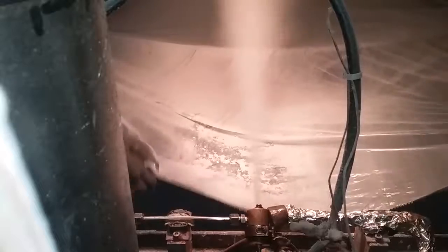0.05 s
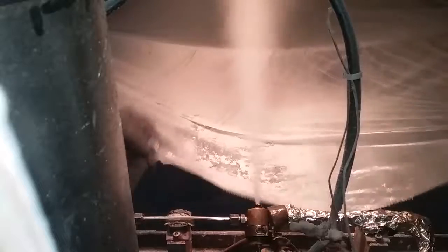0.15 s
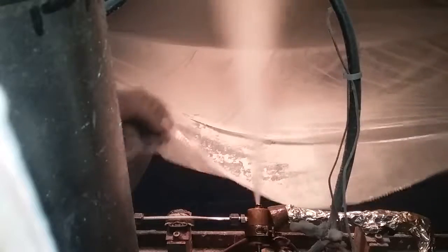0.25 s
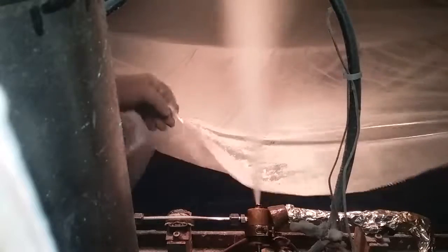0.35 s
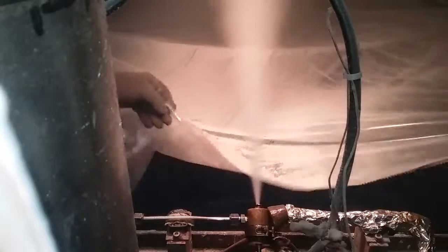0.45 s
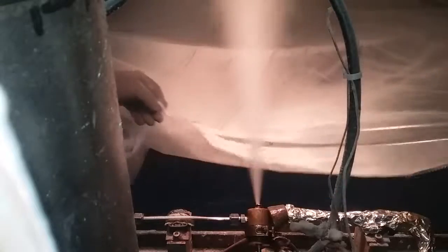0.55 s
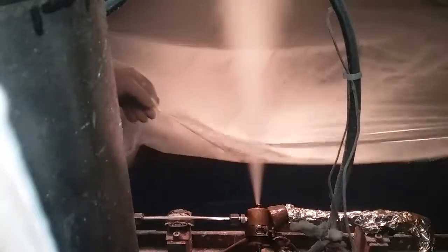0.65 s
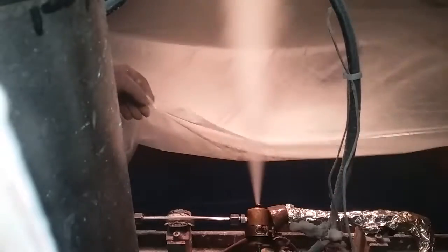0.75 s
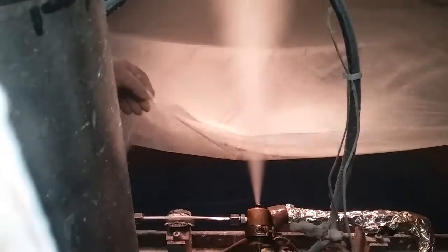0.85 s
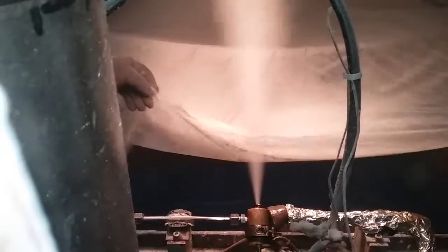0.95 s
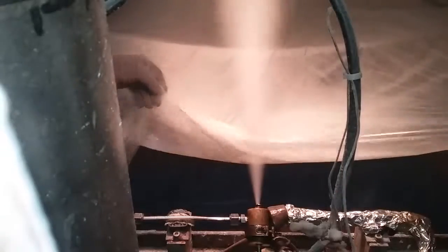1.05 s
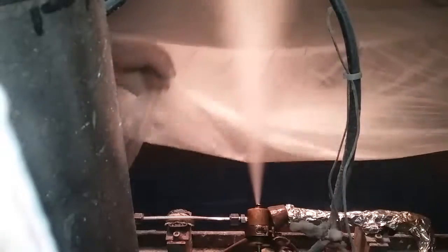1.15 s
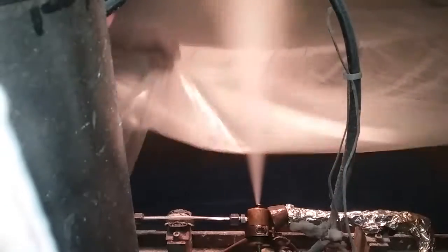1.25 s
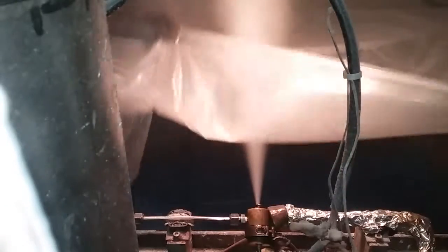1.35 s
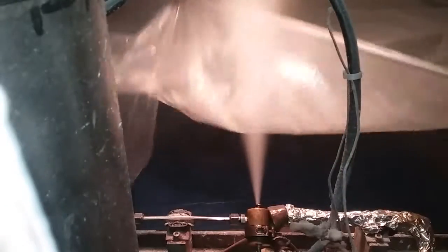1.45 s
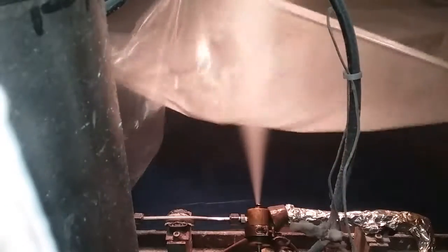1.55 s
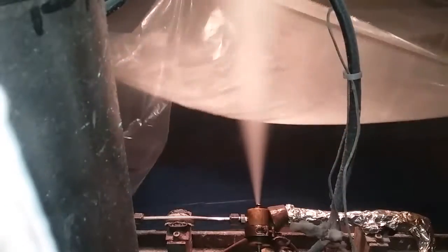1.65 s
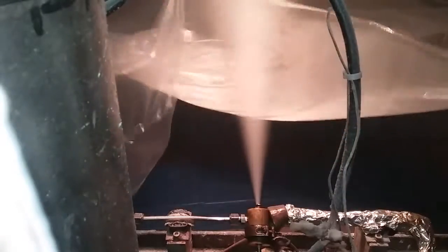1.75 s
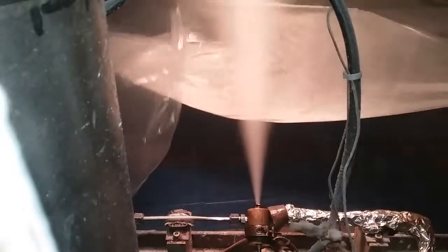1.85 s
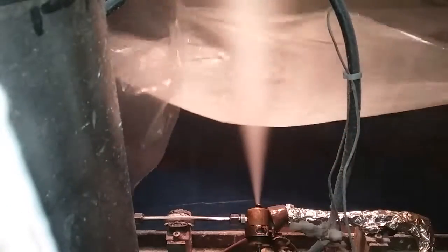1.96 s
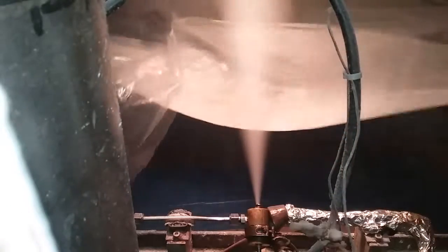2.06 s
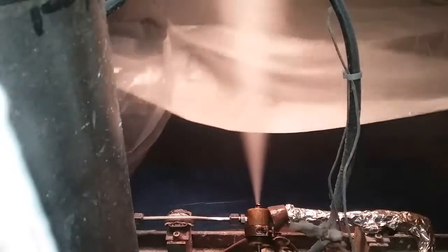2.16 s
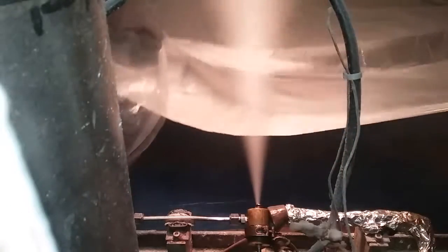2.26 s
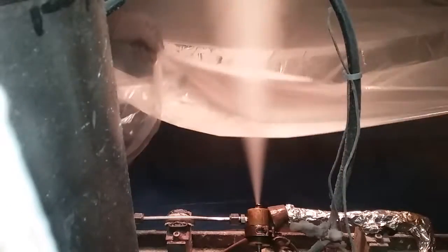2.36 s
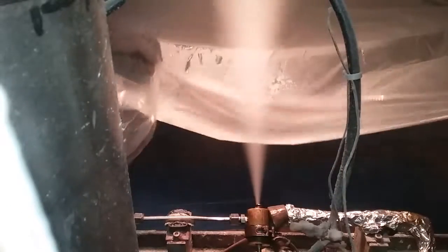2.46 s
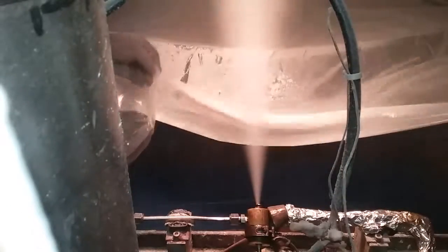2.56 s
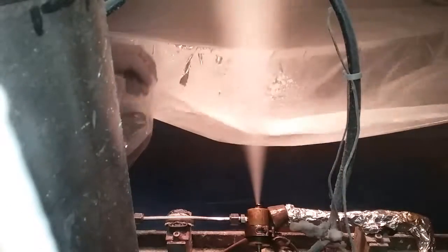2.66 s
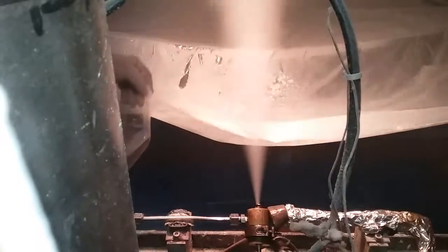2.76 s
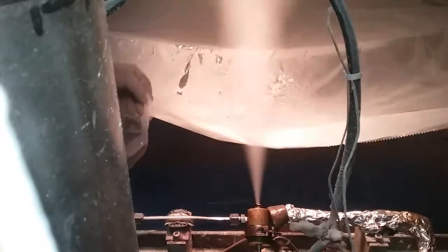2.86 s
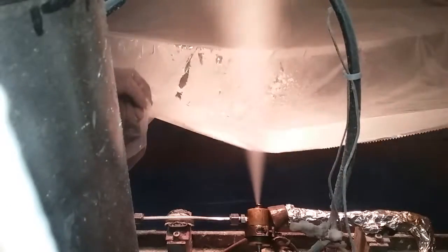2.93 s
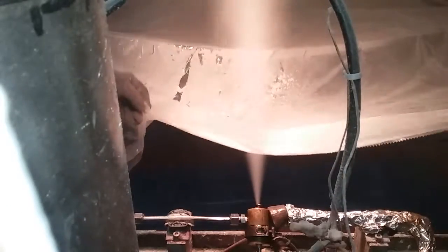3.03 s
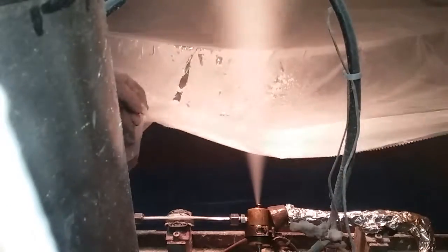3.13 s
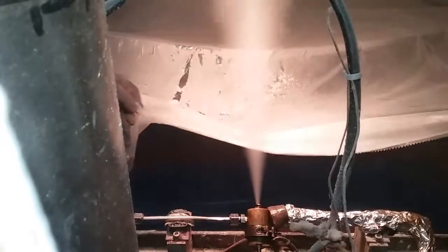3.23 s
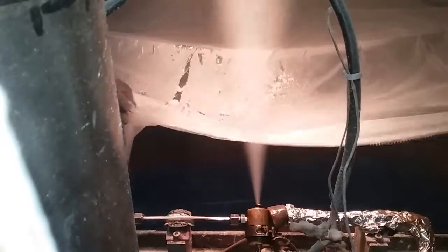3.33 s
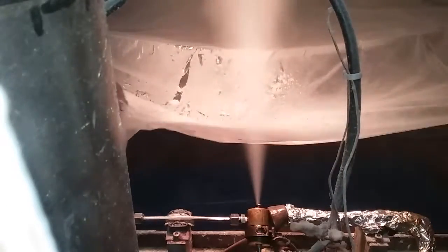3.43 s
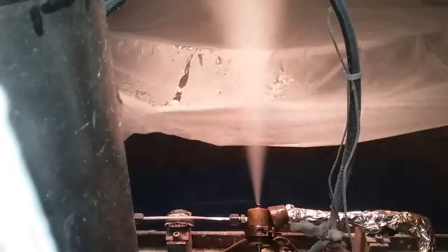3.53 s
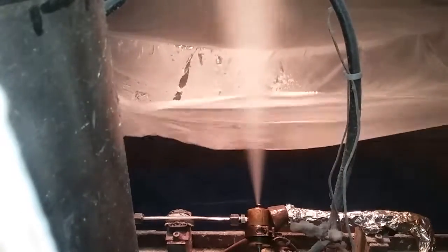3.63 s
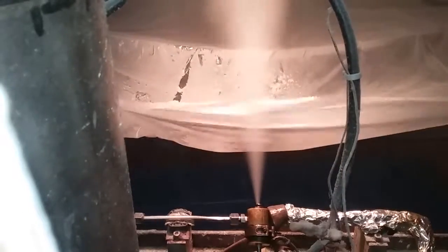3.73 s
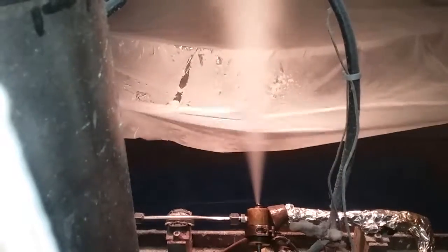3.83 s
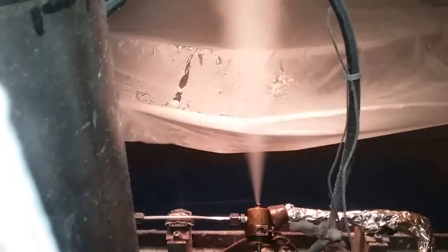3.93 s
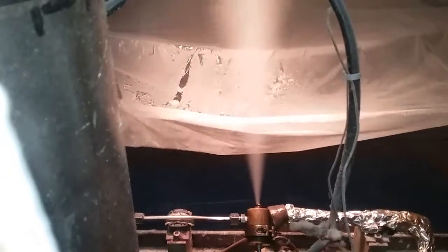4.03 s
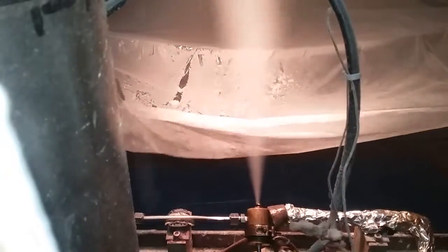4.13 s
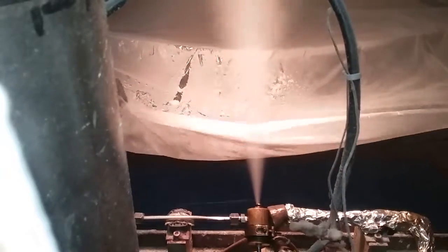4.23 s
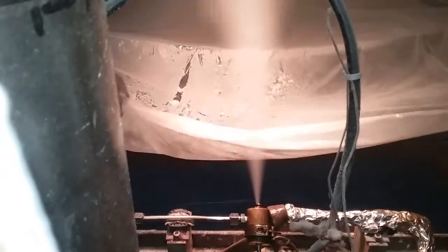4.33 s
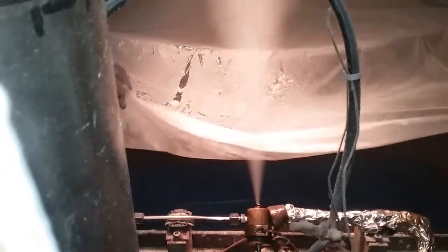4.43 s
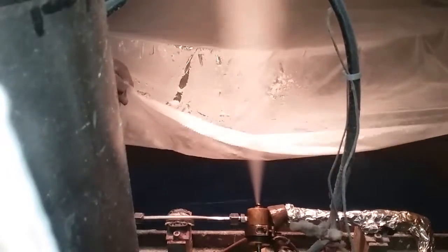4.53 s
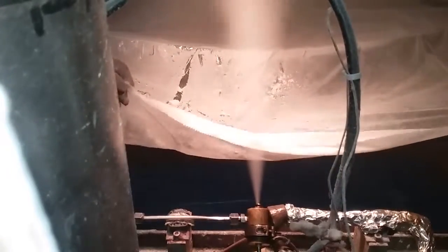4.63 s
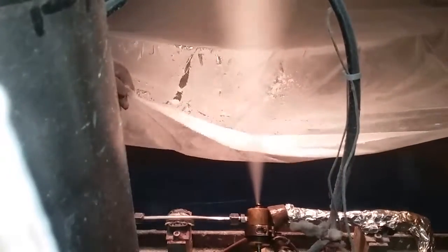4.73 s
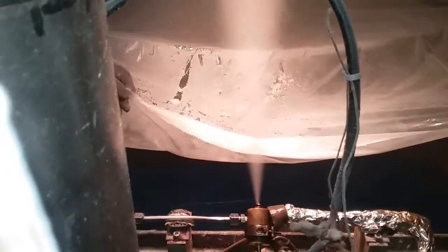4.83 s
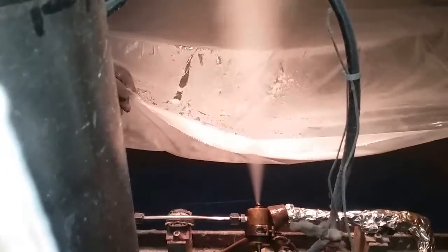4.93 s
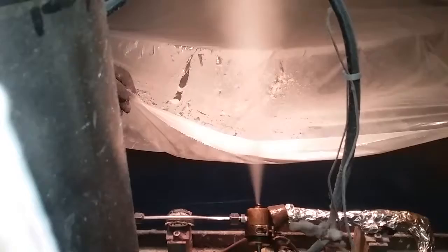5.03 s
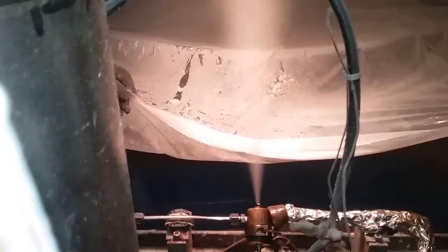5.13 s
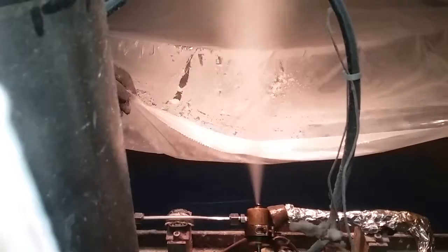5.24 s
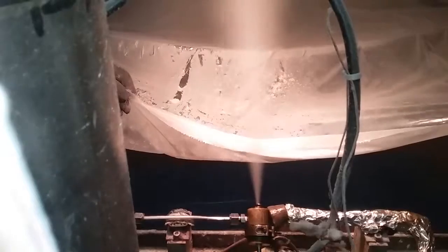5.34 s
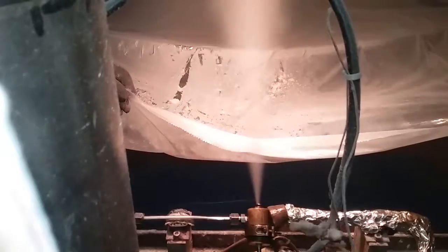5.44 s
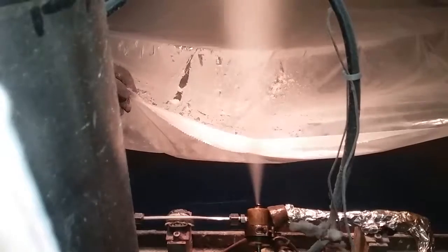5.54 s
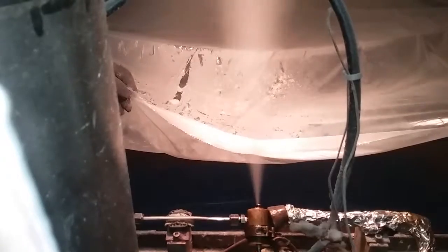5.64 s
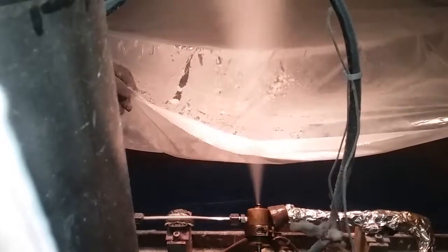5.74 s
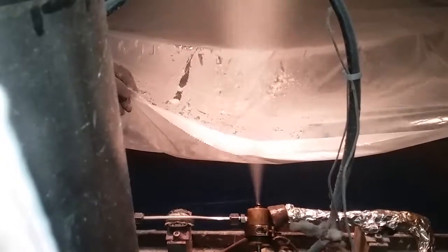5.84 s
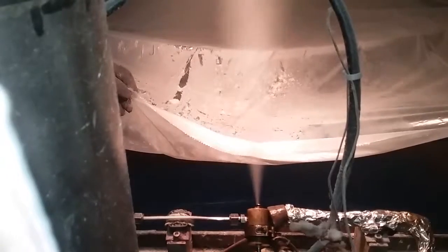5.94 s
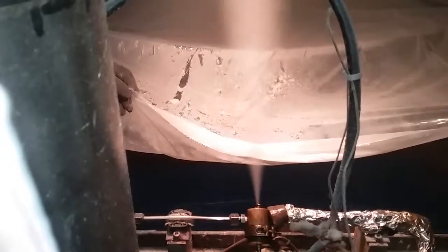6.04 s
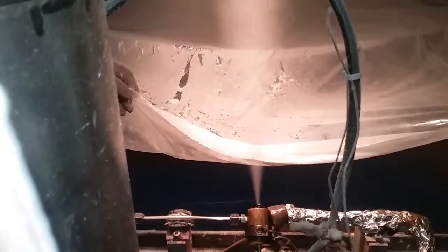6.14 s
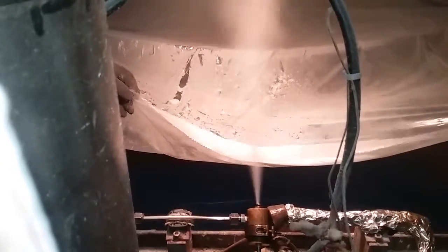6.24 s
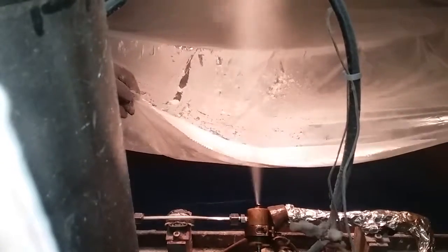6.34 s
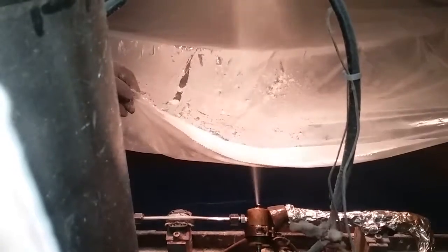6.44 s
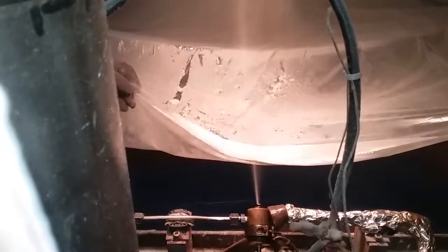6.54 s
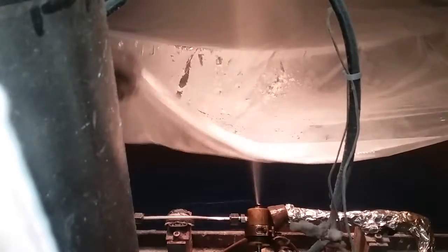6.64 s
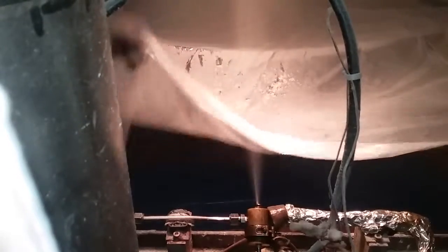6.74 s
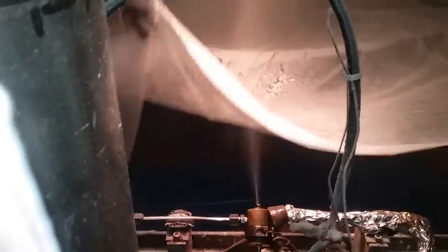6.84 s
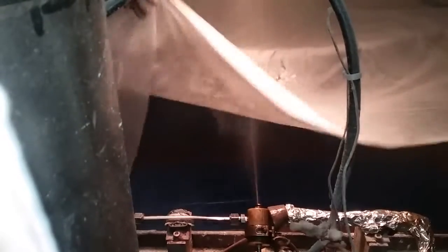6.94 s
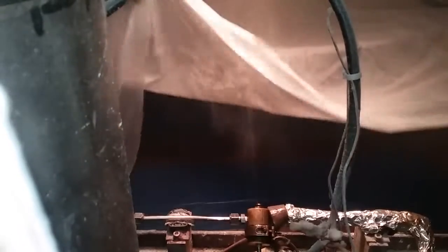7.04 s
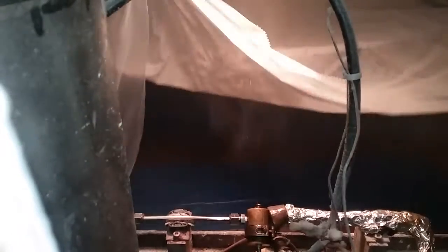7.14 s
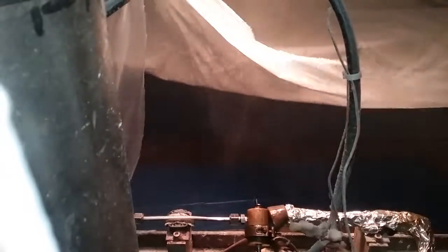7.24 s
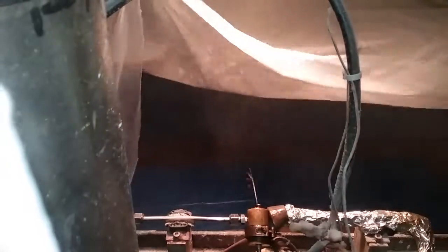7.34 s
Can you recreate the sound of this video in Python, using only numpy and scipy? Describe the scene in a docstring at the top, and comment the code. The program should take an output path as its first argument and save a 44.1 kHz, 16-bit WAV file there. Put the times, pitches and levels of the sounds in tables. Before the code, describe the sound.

A loud broadband hiss, full in the mids and airy on top, blasts steadily from a nearby nozzle under a plastic sheet, with two faint brighter sizzles as mist grazes the plastic. It fades quickly to a fluttering trickle, spits, pings and dies after seven seconds, leaving quiet indoor machine hum, thin high tones and small chirring pulses. Close wide stereo, short room echo.

```python
"""A workshop, with a stereo phone microphone close to a nozzle that jets fine mist up into a plastic sheet.
The hiss is noise in three bands, coloured by standing waves between sheet and rig; echoes off the moving
sheet slide in time, so the treble shimmers. The pressure sags, then the jet sputters, pings and fizzes out.
A quiet room is left: noise with a low machine hum, narrow whines, steady tones and a high, pulsing chirr."""
import sys
import numpy as np
from scipy import signal
from scipy.fft import rfft, irfft, next_fast_len
from scipy.io import wavfile
from scipy.ndimage import map_coordinates

SR = 44100
rng = np.random.default_rng(int(sys.argv[2]) if len(sys.argv) > 2 else 0)


def to_wav(s):
    """Save 16-bit WAV."""
    ch = np.atleast_2d(s).T  # columns
    pcm = np.round(np.clip(ch, -1, 1) * 32767)  # PCM
    wavfile.write(sys.argv[1], SR, pcm.astype(np.int16))


N = 325524
TIME = np.arange(N) / SR
PADDED = next_fast_len(N + SR // 2, True)  # room for the echo tails
FREQ = np.fft.rfftfreq(PADDED, 1 / SR)
SIDES = np.array([[.5], [-.5]])  # shares a left-minus-right difference between the two ports
TOP_HZ = 15700  # the microphone's upper limit

# distance of the sheet above the nozzle: (time [s], height [m])
SHEET_HEIGHT = [(0, .005), (.25, .01), (.75, .06), (1.25, .065), (1.7, .11), (3, .07), (3.5, .08),
                (4.6, .06), (6.5, .052), (7.3, .14)]
# the valve closes, lingers at a trickle and shuts: (time [s], hiss against full pressure [dB])
VALVE_CLOSING = [(5.92, 0), (6.06, -0.6), (6.27, -4), (6.38, -14), (6.76, -13.5), (6.93, -18.5),
                 (7.04, -26.5), (7.12, -29), (7.17, -52)]
# the jet grazes the moving sheet: (time [s], length [s], sizzle against the jet level [dB])
SHEET_GRAZES = [(1.47, 0.24, -9), (3.832, .2, -6)]


def undb(db):
    """Decibels to gain."""
    return 10 ** (np.asarray(db) / 20)


def unit(x):
    """Scale to rms 1."""
    return x / np.sqrt(np.mean(x ** 2))


def curve(rows):
    """The values of a (time, value) table, joined by straight lines."""
    times, values = np.transpose(rows)
    return np.interp(TIME, times, values)


def spectrum(rows):
    """The values of a (frequency, value) table, joined on a log frequency axis."""
    hz, values = np.transpose(rows)
    return np.interp(np.log(FREQ + 1), np.log(hz), values)


def bell(x, centre, width):
    """A bump of height 1 and the given width at half height."""
    return .5 ** ((2 * (x - centre) / width) ** 2)


def swells(rows):
    """Gain over time: one bump for each row of (time [s], length [s], peak [dB])."""
    return sum(undb(db) * bell(TIME, at_s, length_s) for at_s, length_s, db in rows)


def shape(x, gain):
    """Filter by a gain for every frequency."""
    return irfft(rfft(x, PADDED) * gain, PADDED)[..., :N]


def walk(rate):
    """Slow random wandering of rms 1, its spectrum halved at the given rate [Hz]."""
    return unit(shape(rng.standard_normal(N), bell(FREQ, 0, 2 * rate)))


def noise_pair(likeness):
    """Left and right white noise that share the given part (0-1) of their power."""
    shared = shape(rng.standard_normal(N), np.sqrt(likeness))
    separate = shape(rng.standard_normal((2, N)), np.sqrt(1 - likeness))
    return shared + separate


def droplets(per_s, spread_db):
    """Tiny impacts on the sheet: many faint, a few stronger."""
    hit = rng.random(N) < per_s / SR
    strength = rng.standard_normal(N) * undb(spread_db * rng.standard_normal(N))
    return unit(hit * strength)


def echoes(x, t60_s):
    """A diffuse tail as strong as the sound itself, different at each port."""
    tail = rng.standard_normal((2, N)) * np.exp(-np.log(1000) * TIME / t60_s)
    return shape(x, rfft(unit(tail), PADDED) / np.sqrt(N))


def spray(gain_db=1.29, full_db=-19, sag_db=12, surge_db=0.07):
    """The jet as heard in the workshop, surging slightly; weak runs from 0 at full pressure to 1 at a trickle."""
    jet_db, mist_db, rush_db = flow()
    weak = np.clip((full_db - jet_db) / sag_db, 0, 1)
    plume = nozzle(mist_db, rush_db, weak)
    jet = standing_waves(thinning(plume, weak))
    surging = undb(jet_db + surge_db * walk(rate=2.5))
    return workshop(surging * (undb(gain_db) * jet + sheet_contact()))


def flow(full_db=-16.5, sag_db_per_s=0.2182, graze_shade_db=-1.05):
    """Levels in dB of jet, fine mist and low rush: all follow the pressure, and a thin jet is duller."""
    # the thin jet chokes or spurts for a moment: (time [s], length [s], level change [dB])
    sputters = [(6.295, .02, -1.5), (6.339, .02, 3.5), (6.42, .035, -3.5), (6.45, 0.026, 2),
                (6.527, .016, 0), (6.575, 0.043, -6.5), (6.812, .02, -1), (6.875, 0.028, -0.5),
                (6.938, .014, 1), (6.97, 0.03, -6.5), (7, .016, 3)]
    valve_db = curve(VALVE_CLOSING)
    sputter_db = sum(db * bell(TIME, at_s, length_s) for at_s, length_s, db in sputters)
    # a grazing sheet shields the nozzle
    shade_db = graze_shade_db * sum(bell(TIME, at_s, length_s) for at_s, length_s, _ in SHEET_GRAZES)
    jet_db = full_db - sag_db_per_s * TIME + valve_db + sputter_db + shade_db

    # mist and rush are levels against the hiss; the mist sags faster than the hiss
    mist_db = -.2 * TIME - .5 * (1 - undb(valve_db))
    # the last liquid leaves as a bright spit of mist, then the mist dries up
    spit_db = 7 * bell(TIME, 6.99, .09)
    drying_db = 170 * np.maximum(TIME - 7.035, 0)
    mist_db = mist_db + spit_db - drying_db

    # the rush gains as the valve takes pressure away, and when the sheet is close to the nozzle
    close_db = 3 * np.exp(-curve(SHEET_HEIGHT) / .033)
    rush_db = -2 - .37 * valve_db + close_db
    return jet_db, mist_db, rush_db


def nozzle(mist_db, rush_db, weak, drops_db=-11, mist_flicker_db=.5, flutter_db=1.5):
    """The turbulent plume reaches the ports partly alike; its bands surge together, more so in a weak jet."""
    # how alike the two ports hear the plume: (frequency [Hz], likeness [0-1])
    port_likeness = [(420, 1), (650, .78), (900, .78), (1100, .4), (1330, .78), (1800, .52), (2000, .76),
                     (2500, .42), (2980, .55), (3630, .4), (4150, .82), (4650, .36), (4970, .32),
                     (5150, .68), (5500, .68), (5700, .42), (6300, .36), (7000, .42), (13000, .45),
                     (15500, .28)]
    plume = noise_pair(spectrum(port_likeness))
    # large eddies make the low rush, the break-up into fine mist makes the top
    low = 1 / (1 + (FREQ / 1350) ** 6)
    high = 1 - 1 / (1 + (FREQ / 6300) ** 8)
    hiss = shape(plume, 1 - low - high)
    mist = shape(plume + undb(drops_db) * droplets(per_s=3300, spread_db=1.5), high)
    mist = mist * undb(mist_db + mist_flicker_db * walk(rate=37))
    rush = shape(plume, low) * undb(rush_db + flutter_db * weak * walk(rate=25))
    eddies_db = .2 * walk(rate=22) + (.3 + .9 * weak) * walk(rate=110)
    return (rush + hiss + mist) * undb(eddies_db)


def thinning(x, weak, offset_db=-1.5):
    """A thin jet sounds from one point, so its echoes off sheet and rig stay sharp and hollow the tone."""
    # resonances and hollows: (frequency [Hz], width [Hz], left level [dB], right level [dB])
    thin_jet = [(740, 380, 5, 5), (1020, 120, 3, 3), (1150, 110, -4, -4), (1420, 420, -2, -3),
                (1990, 220, 3, 3.5), (2360, 260, -6, -6), (2680, 130, 2, -1), (2830, 110, -4, -4),
                (2970, 90, 1.5, 1.5), (3140, 140, 3.5, 3.5), (3660, 140, -4, -4), (3910, 110, -1, -4),
                (4130, 200, 4.5, 5.5), (4440, 150, 3.5, 1), (4720, 190, -8, -6.5), (5100, 220, 2.5, 4),
                (5330, 200, 1, 4), (5600, 150, 5, 2.5), (5790, 90, 0, 4), (5920, 110, -2, -5),
                (6560, 120, -3, -4), (6810, 170, -8, -7), (7150, 220, 6, 1), (7450, 150, -7, -7),
                (7700, 150, 3, 3), (7900, 150, -6, -4), (8300, 350, 3, 4.5), (8680, 200, 4, 1),
                (8860, 130, -4, -6), (9120, 250, 7, 3.5), (9950, 250, -1, 3.5), (10450, 600, 3.5, -1),
                (11200, 400, -1, -2), (11650, 300, -3.5, -4.5), (12900, 300, 1, -4.5),
                (13650, 350, 0, -2.5), (14800, 250, 0, 3), (15250, 500, -3, -5)]
    colour_db = offset_db
    for hz, width, left_db, right_db in thin_jet:
        colour_db = colour_db + bell(FREQ, hz, width) * np.array([[left_db], [right_db]])
    return (1 - weak) * x + weak * shape(x, undb(colour_db))


def standing_waves(x):
    """The gap between sheet and rig colours the hiss differently at each port."""
    # relative hiss spectrum at full pressure: (frequency [Hz], density [dB per Hz])
    hiss_spectrum = [(210, -78), (290, -42), (400, -35.5), (520, -28.3), (800, -18.6), (1100, -15.3),
                     (1400, -7), (2000, -5), (3000, -5.5), (4400, -0.5), (5600, -5.5), (6400, -11.5),
                     (9000, -9), (12000, -8.5), (15600, -9)]
    # how the hiss leans: (frequency [Hz], left minus right [dB])
    port_lean = [(300, .8), (500, -2.5), (700, -2), (1500, -2.7), (3200, -1.3), (4350, -1.2), (6500, .3),
                 (10000, 4.6), (13000, .1), (15500, -2.3)]
    # sharp resonances of the metal rig: (frequency [Hz], width [Hz], level [dB])
    rig_rings = [(586, 50, 3), (2324, 40, 2), (2473, 30, 2.5), (3483, 70, 1.5), (3904, 80, 2),
                 (5148, 70, 2.5), (7333, 60, 3), (8123, 130, 1.5), (9530, 60, 2), (9915, 60, 3.5),
                 (10564, 140, 1), (11885, 110, 2), (13216, 240, 2), (14798, 160, 2), (15437, 130, 2)]
    # waves between sheet and rig:
    # (frequency [Hz], width [Hz], left level [dB], right level [dB], left lead [rad])
    gap_waves = [(1970, 240, 2.7, 1.5, 0), (2380, 240, -.2, 3, .8), (2690, 140, 2.4, 1.6, 0),
                 (2950, 320, 3.3, 5.9, 0), (3490, 320, -2, 6.4, .1), (3870, 320, 1.1, 4.5, .3),
                 (4240, 400, 5.6, 1.8, 0), (4450, 180, .6, 1.2, .4), (4970, 300, -2.2, -4, 1.1),
                 (5300, 500, 1.2, 1.4, .3), (6000, 380, 3.9, 2.3, 3.4), (6440, 280, 3.2, 1.2, -2.9),
                 (6810, 580, 2.6, 3, -.5), (7660, 200, -.9, -1.9, 3.7), (8290, 420, 0, 6.2, -1.9),
                 (8590, 470, -2.4, -2.5, 3.2), (9490, 140, .3, 2.2, .2), (9760, 190, -4.1, -.7, 2.2),
                 (10620, 220, 4.1, 1.5, -.6), (11080, 460, -1.8, .8, -.7), (11990, 410, 2.2, 2.4, -.9),
                 (12310, 240, 1.1, 1.9, -1.5), (14660, 600, -.9, 1.1, -.6), (15060, 210, -2.1, -1.2, 2.6)]
    colour_db = spectrum(hiss_spectrum) + SIDES * spectrum(port_lean)
    for hz, width, db in rig_rings:
        colour_db = colour_db + db * bell(FREQ, hz, width)
    # the two ports resonate a little apart, so their phase slips one whole turn near 4 kHz
    lead = 2 * np.pi / (1 + np.exp((4180 - FREQ) / 220))
    for hz, width, left_db, right_db, rad in gap_waves:
        wave = bell(FREQ, hz, width)
        colour_db = colour_db + wave * np.array([[left_db], [right_db]])
        lead = lead + wave * rad
    return shape(x, unit(undb(colour_db)) * np.exp(1j * SIDES * lead))


def workshop(x, walls_t60_s=.25, walls_db=-14, sheet_t60_s=.08, sheet_db=-9.5):
    """Walls add a short, faint tail; echoes off the moving sheet slide in time, so the treble shimmers."""
    # the sound travels to the sheet and back at 343 m/s
    late = np.arange(N) - 2 * curve(SHEET_HEIGHT) / 343 * SR
    diffuse = echoes(x, sheet_t60_s)
    off_sheet = np.array([map_coordinates(port, [late], mode="nearest") for port in diffuse])
    return x + undb(walls_db) * echoes(x, walls_t60_s) + undb(sheet_db) * off_sheet


def sheet_drum(hz=850, width_hz=260, contact_db=-46, reach_m=0.028):
    """While the sheet lies right on the nozzle, the jet drums on it with a hollow note."""
    drumming = unit(shape(noise_pair(.8), bell(FREQ, hz, width_hz)))
    closeness = np.exp(-curve(SHEET_HEIGHT) / reach_m)
    return drumming * undb(contact_db + curve(VALVE_CLOSING)) * closeness


def background(room_db=-56.8, pan_db=-2, waver_db=1.2, drift_rad=.35):
    """Room noise, alike at both ports in the bass, with narrow whines and steady tones."""
    # relative room noise with a low hump of machine hum: (frequency [Hz], density [dB per Hz])
    room_spectrum = [(20, -4), (50, -5), (82, 1), (100, -2), (118, 1.5), (145, -6), (190, -5), (350, -7.5),
                     (650, -4), (1400, -.5), (2000, .5), (2600, 2), (3200, -3.5), (4500, -3.5), (6000, -13),
                     (15500, -16.5)]
    # clean tones that stand out: (frequency [Hz], rms level [dB], left minus right [dB])
    clean_tones = [(793, -70, -3), (3863, -61, -6), (4112, -62, -2)]
    # narrow bands of whine: (frequency [Hz], width [Hz], rms level [dB], left minus right [dB])
    whine_bands = [(815, 75, -65.5, -3), (3620, 150, -63.5, -10), (3725, 70, -62.5, -6),
                   (3900, 140, -67, -6), (4112, 60, -59, -2), (4185, 55, -64, -2)]
    room = noise_pair(0.88 / (1 + (FREQ / 1800) ** 2))
    out = unit(shape(room, undb(spectrum(room_spectrum)))) * undb(room_db + SIDES * pan_db)
    for hz, db, side_db in clean_tones:
        tone = unit(np.sin(2 * np.pi * hz * TIME + drift_rad * walk(rate=10)))
        out = out + tone * undb(db + SIDES * side_db + waver_db * walk(rate=6))
    air = noise_pair(0.35)
    for hz, width, db, side_db in whine_bands:
        whine = unit(shape(air, np.sqrt(bell(FREQ, hz, width))))
        out = out + whine * undb(db + SIDES * side_db)
    return out


def sheet_flap(hz=380, width_hz=500):
    """The loose sheet gives soft, dull flaps: short swells of low noise."""
    # (time [s], length [s], level [dB])
    flaps = [(.05, 0.11, -59), (.53, .06, -62), (3.75, .07, -64), (7.1, .05, -63)]
    return unit(shape(rng.standard_normal(N), bell(FREQ, hz, width_hz))) * swells(flaps)


def sheet_contact(sizzle_hz=10500):
    """Mist that hits the plastic at a grazing angle sizzles brightly."""
    spatter = noise_pair(.3) + .5 * droplets(per_s=4000, spread_db=3)
    top_band = 1 / (1 + (sizzle_hz / (FREQ + 1)) ** 20) / (1 + (FREQ / TOP_HZ) ** 20)
    return unit(shape(spatter, top_band)) * swells(SHEET_GRAZES)


def rig_ping(at_s=6.903, hz=3500, peak_db=-36, t60_s=0.12):
    """A drop strikes the metal rig, which rings briefly as a decaying sine."""
    age = np.maximum(TIME - at_s, 0)
    return undb(peak_db) * np.sin(2 * np.pi * hz * age) * np.exp(-np.log(1000) * age / t60_s)


def last_fizz(at_s=7.03, length_s=0.073, peak_db=-53, hz=8600, fall_octaves_per_s=8, width_hz=3000):
    """The last of the liquid fizzes out of the nozzle, falling in pitch as the pressure dies."""
    centre = np.minimum(hz * 2 ** (-fall_octaves_per_s * (TIME - at_s)), TOP_HZ)
    carrier = np.sin(2 * np.pi * np.cumsum(centre) / SR)
    fizz = unit(shape(noise_pair(.5), bell(FREQ, 0, width_hz)) * carrier)
    return fizz * swells([(at_s, length_s, peak_db)])


def chirr(hz=4130, drift_rad=.6, pan_db=-3):
    """Short, nearly pure pulses of a high chirr: a sine with wandering phase."""
    # (time [s], length [s], peak level midway between the ports [dB])
    pulses = [(7.1, .012, -50), (7.177, 0.014, -48.5), (7.209, 0.015, -48.5), (7.265, .012, -52),
              (7.3, .014, -48), (7.356, .014, -52)]
    tone = np.sin(2 * np.pi * hz * TIME + drift_rad * walk(rate=76))
    return swells(pulses) * tone * undb(SIDES * pan_db)


def scene():
    """The spray over the quiet workshop."""
    jet = spray() + sheet_drum()
    around = background() + sheet_flap() + chirr()
    ending = rig_ping() + last_fizz()
    return jet + around + ending


def record(dry):
    """The phone microphone cuts the top steeply."""
    steep_cut = signal.ellip(12, .1, 80, TOP_HZ, fs=SR, output="sos")
    return signal.sosfilt(steep_cut, dry)


dry = scene()
out = record(dry)
to_wav(out)
```